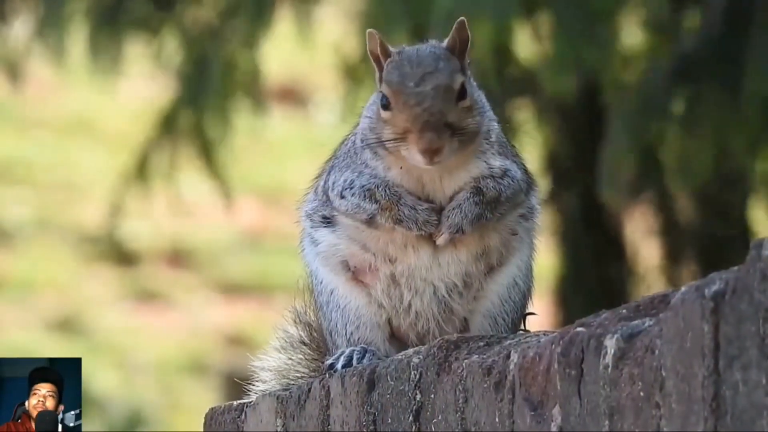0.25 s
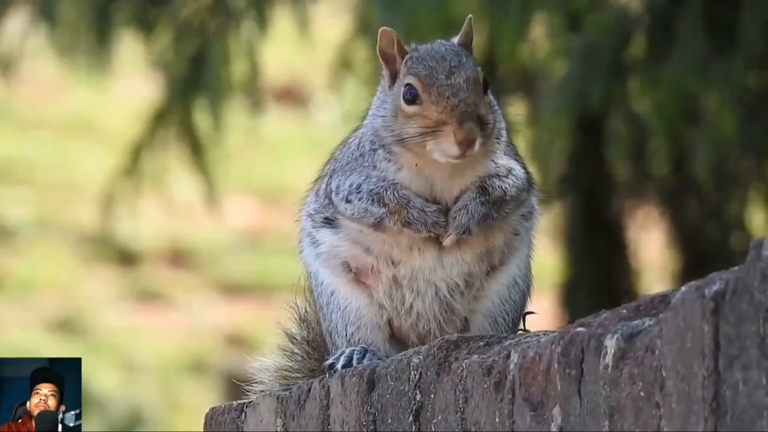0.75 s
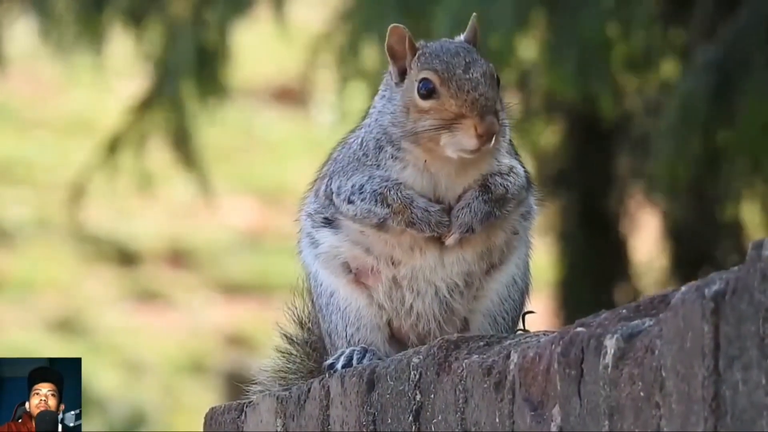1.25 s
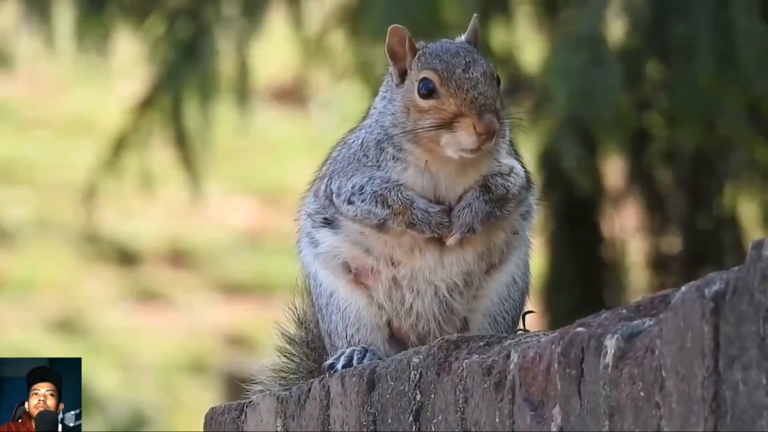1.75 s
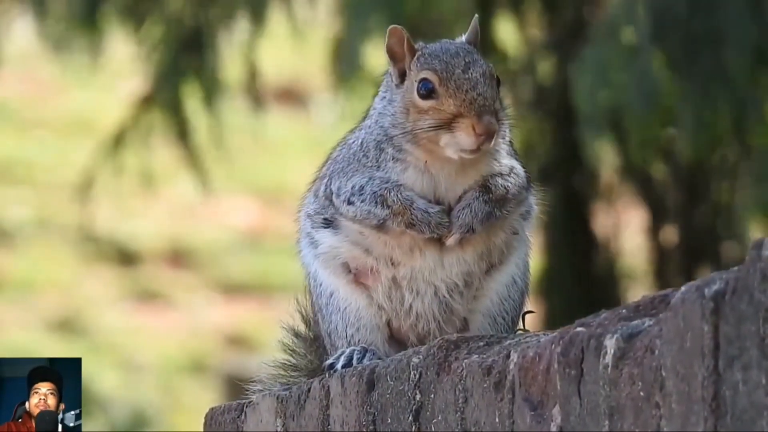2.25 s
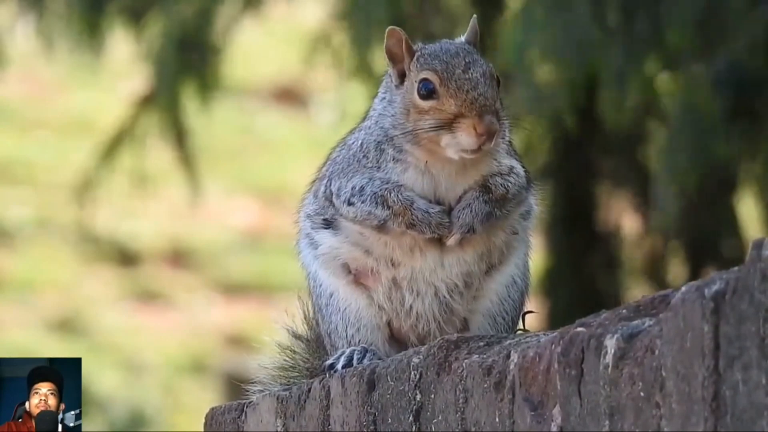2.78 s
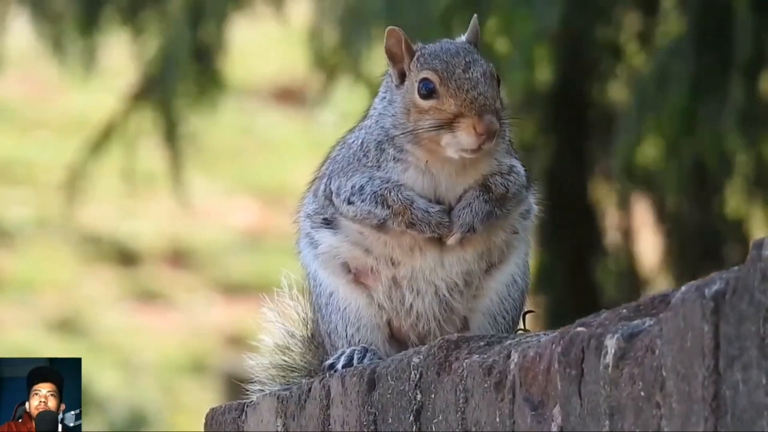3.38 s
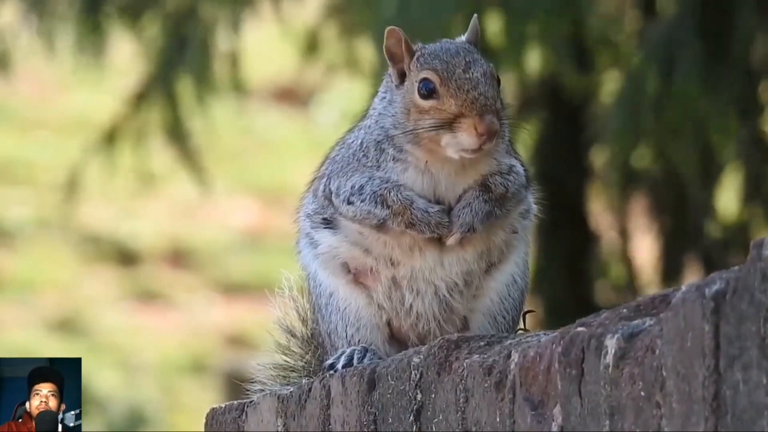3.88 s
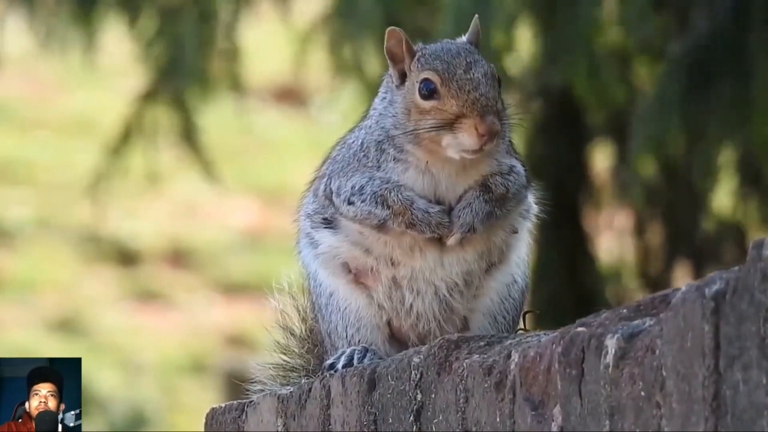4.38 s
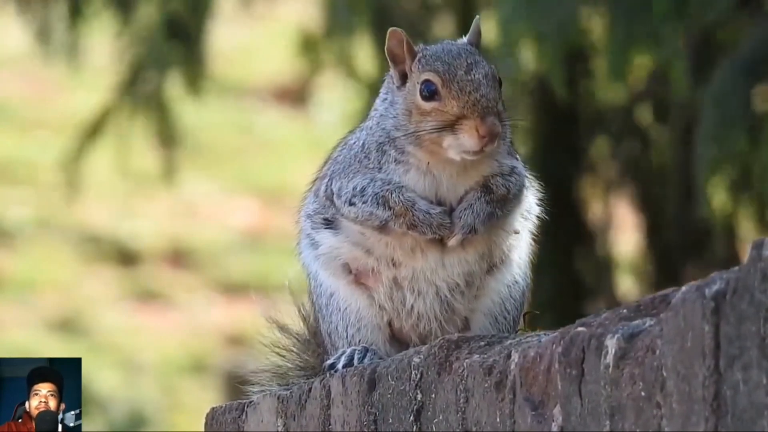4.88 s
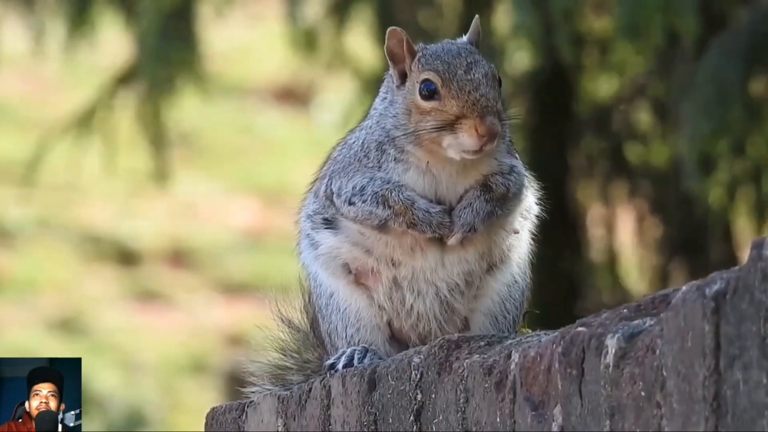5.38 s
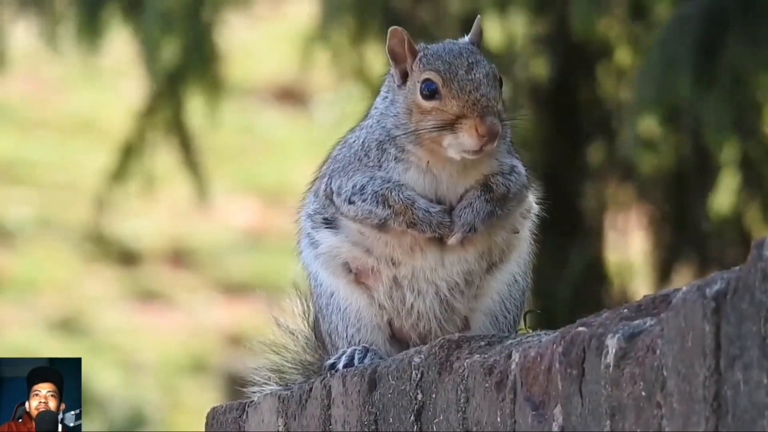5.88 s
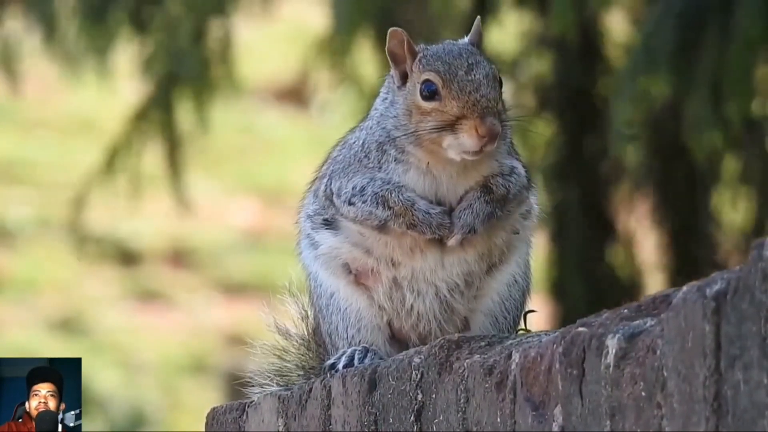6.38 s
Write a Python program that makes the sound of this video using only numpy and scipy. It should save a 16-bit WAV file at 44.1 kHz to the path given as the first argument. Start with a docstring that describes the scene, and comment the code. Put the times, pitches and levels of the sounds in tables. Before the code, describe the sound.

High, hoarse squirrel barks come in three quick pairs, then ten single calls, in a quiet garden with faint leaf hiss.

```python
"""A grey squirrel on a garden fence opens with three quick pairs of barks, a soft bump under the first.
Ten single barks follow. Each is one push of air: a rasp, a pitch arch near 2 kHz, a rasp again.
At the top of the high barks the vocal folds alternate cycles and add half-pitch tones between harmonics.
Fence and trees answer each bark briefly. Two tiny ticks and three far rustles fall along the way.
Throughout: low outdoor rumble, distant machine hum, a faint hiss of leaves."""
import sys
import numpy as np
from scipy import signal
from scipy.fft import rfft, irfft, next_fast_len
from scipy.io import wavfile
from scipy.ndimage import map_coordinates

SR = 44100
rng = np.random.default_rng(int(sys.argv[2]) if len(sys.argv) > 2 else 0)


def unload_wav(signal):
    """Save mono or channel-first audio to the path in sys.argv[1] as 16-bit WAV at rate SR, clipped to [-1, 1]."""
    wavfile.write(
        sys.argv[1],
        SR,
        np.round(np.clip(np.atleast_2d(signal).T, -1, 1) * 32767).astype(np.int16),
    )


N = 292912

# Barks: (apex time [s], apex pitch [Hz], rise [s], fall [s], sweep [fraction of pitch],
# mouth gape [clipped to 0-1], level [dB], 2nd harmonic [dB], 3rd harmonic [dB], split [dB],
# rasp [dB], rasp lead before apex [s], fizz above 7.5 kHz [dB])
BARK_SCORE = [ (0.257, 2051, 0.033, 0.016, .52, 1, -12.5, 0, -1, -37, 0.5, .036, 1.5),
              (.334, 1839, 0.025, 0.017, .19, 0.7, -10, -8, -11.5, -35, -6, 0.02, -2),
              (0.766, 2016, .034, .018, 0.4, 0.96, -16.5, -2, -1.5, -39, 4, .035, 2),
              (.855, 2256, 0.018, 0.018, .33, 3, -21, -6.5, -5, -17.5, -2, 0.014, -2),
              (1.204, 1914, .019, 0.01, 0.1, 0.8, -24, -15.5, -22, -36.5, -17, 0.03, 2.5),
              (1.295, 2270, .031, .016, .28, 0.25, -14.5, -1.5, -7, -5.5, -1, 0.037, -0.5),
              (1.746, 2299, .027, .018, .31, 0.06, -16, 1, 1.5, -1.5, 2, .031, 0.5),
              (2.398, 2268, .025, 0.014, 0.2, 0.11, -14, -0.5, -2, -3, 1, .025, -2),
              (2.94, 2291, 0.022, .015, .33, 0.05, -15.5, 0.5, -2, -5, 2, .026, -1.5),
              (3.361, 2225, .022, .016, .28, 0.03, -17, -0.5, -3, -21.5, 6, 0.027, -1.5),
              (3.781, 2255, .026, 0.014, .27, 0.2, -14.5, -1, -3, -4, 0.5, 0.028, 2.5),
              (4.263, 2350, 0.025, .015, .31, 0.06, -15.5, 1, -1, -1.5, 2.5, 0.029, -1),
              (4.979, 2228, .024, 0.019, .32, 0.01, -17, 1, 1, -4.5, 4, .030, -2.5),
              (5.381, 2376, 0.02, .016, .29, 0.14, -14, -0.5, 0, 0, 1, 0.028, -3.5),
              (5.887, 2377, .032, .018, .33, 0.16, -13, -4, -4.5, -2, 0, .034, -0.5),
              (6.602, 2379, 0.03, 0.015, 0.4, -0.5, -15, 1.5, -3, 3, -1.5, 0.03, -1)]
# Air stream in the throat: (frequency [Hz], level [dB])
RASP_SPECTRUM = [(150, 2), (500, 1.5), (1100, 0.5), (2000, 2), (2700, -4.5), (3600, 1.5), (6000, 0.5),
                 (7300, -6.5), (9500, -2), (11500, -3.5), (15500, -4.5)]
# Throat resonances, mouth nearly shut: (centre [Hz], width [Hz], level [dB])
SHUT_FORMANTS = [(1848, 290, -0.5), (2242, 440, 1.5), (3014, 350, -6.5), (3902, 380, -4.5),
                 (4476, 190, -5.5), (4715, 300, -1.5), (5733, 560, 1), (6366, 1300, -9), (9472, 1800, -16)]
# Throat resonances, mouth gaping: (centre [Hz], width [Hz], level [dB])
GAPE_FORMANTS = [(1109, 3500, -16.5), (1997, 240, -7.5), (3488, 770, -0.5), (4020, 230, -1.5),
                 (4920, 900, -0.5), (5600, 370, 4), (5980, 330, -1.5), (8000, 700, -21.5),
                 (9640, 1100, -18)]
# Stereo width of the direct bark: (frequency [Hz], side gain [dB])
SCATTER_WIDTH = [(500, -7.5), (2000, -17), (3400, -8.5), (4300, -8.5), (6000, -6.5), (9000, -4.5),
                 (14000, -9)]
# Echo decay, fence and trunks: (frequency [Hz], T60 [s])
FENCE_T60 = [(500, .15), (2200, 0.17), (6000, 0.159), (14000, 0.21)]
# Echo decay, garden: (frequency [Hz], T60 [s])
GARDEN_T60 = [(500, .6), (2200, 1), (6000, .5), (14000, .25)]
# Dry ticks: (time [s], level [dB])
TICK_EVENTS = [(1.0056, -44), (5.9994, -43.5)]
# Far rustles: (time [s], half length [s], centre [Hz], level [dB])
RUSTLE_EVENTS = [(2.2, 0.11, 3365, -70.5), (5.299, .025, 7955, -66.5), (5.689, 0.19, 3185, -65)]
# Outdoor noise: (frequency [Hz], level [dB])
AIR_SPECTRUM = [(12, -50.5), (20, -2.5), (70, -4.5), (104, -4), (149, -8), (186, -9), (363, -14.5),
                (454, -15.5), (600, -20), (991, -22.5), (1460, -24.5), (2290, -26.5), (5900, -39.5),
                (8020, -37.5), (15700, -46.5)]
# Left-right likeness of that noise: (frequency [Hz], correlation [0-1])
AIR_COHERENCE = [(60, .98), (150, 1), (500, 0.983), (1600, 1), (5000, 0.46), (15000, 0.56)]
# Leaf hiss: (time [s], level [dB])
LEAF_LEVELS = [(0, -66.5), (1, -68), (2, -68.5), (3, -67.5), (4, -67.5), (4.7, -67), (5.5, -66.5), (6, -68),
               (6.64, -68)]
# Distant machinery: (frequency [Hz], level [dB])
HUM_TONES = [(31, -64), (62.5, -58), (92, -60), (122, -61.5), (990, -70.5)]


def squirrel():
    """Each bark reaches two microphones directly, then off the fence and the garden."""
    out, t = np.zeros((2, N)), np.arange(-SR // 16, SR // 10) / SR
    for apex_s, apex_hz, rise_s, fall_s, sweep, gape, level_db, *timbre in BARK_SCORE:
        call = amp(level_db) * bark(t, apex_hz, rise_s, fall_s, sweep, gape, *timbre)
        add(out, scatter(call), apex_s + t[0])
        fence = amp(-7) * echo_tail(FENCE_T60, delay_s=0.0042)
        garden = amp(-37) * echo_tail(GARDEN_T60, delay_s=0.04)
        add(out, signal.fftconvolve(call[None], fence + garden, axes=1), apex_s + t[0])
    return out


def bark(t, apex_hz, rise_s, fall_s, sweep, gape, second_db, third_db, split_db, rasp_db, lead_s,
         fizz_db):
    """One push of air, apex at t = 0: pitch climbs and drops with the pressure."""
    arch = t / np.where(t < 0, rise_s, fall_s)  # -1 at start, +1 at end
    slack = np.minimum(arch ** 2, 1)  # 0 at peak pressure
    pitch_hz = apex_hz * np.maximum(1 - sweep * arch ** 2, 0.3)
    jitter = 0.001 + 0.026 * slack + np.interp(apex_hz, [1850, 2020], [0.012, 0])  # low barks waver more
    pitch_hz *= 1 + jitter * wobble(1100, len(t))
    phase = 2 * np.pi * np.cumsum(pitch_hz) / SR
    voicing = ease((arch + 0.94) / 0.1) * ease((0.78 - arch) / 0.18)
    split = amp(split_db) * ease((pitch_hz / apex_hz - 0.98) / 0.01)  # near the apex only
    voice = voicing * vocal_folds(phase, split, second_db, third_db)
    side_tone = voicing * split * amp(-19) * np.sin(2 * phase - 2 * np.pi * 3910 * t)
    breath = amp(rasp_db - 15.5) * rasp(t, phase, gape, lead_s, fall_s)
    call = filtered(voice, lambda hz: throat(hz, gape)) + side_tone + breath
    fizz = filtered(call, lambda hz: ease((hz - 7500) / 300))
    return call + fizz * (amp(fizz_db + 3 - 5 * slack) - 1)


def vocal_folds(phase, split, second_db, third_db):
    """Six harmonics; unequal alternate cycles draw power into half-order tones."""
    def partial(order, db):
        flicker_db = 2.2 * wobble(220, len(phase))
        return amp(db + flicker_db) * np.sin(order * phase + rng.uniform(0, 2 * np.pi))

    harmonics = partial(1, -4 * split) + partial(2, second_db) + partial(3, third_db - 7 * split)
    harmonics += sum(partial(k, third_db - 4.5 - 3 * (k - 4)) for k in range(4, 7))
    return harmonics + split * (partial(5 / 2, 0) + partial(7 / 2, -3) + partial(3 / 2, -8))


def rasp(t, phase, gape, lead_s, fall_s):
    """Air hisses through the throat, chopped by the folds, and trails off after the voice."""
    envelope = ease((t + lead_s) / 0.0046) * amp(-600 * np.maximum(t - 0.47 * fall_s, 0))
    chopped = noise(RASP_SPECTRUM, len(t)) * (1 + 0.5 * np.sin(phase))
    hiss = unit(filtered(chopped, lambda hz: throat(hz, gape) ** 0.63))
    return envelope * hiss * amp(2.6 * wobble(400, len(t)))


def throat(hz, gape):
    """Vocal tract gain, blended between shut and gaping."""
    def shape(formants):
        peaks = [amp(db) / (1 + 2 * ((hz - centre_hz) / width_hz) ** 2) ** 2
                 for centre_hz, width_hz, db in formants]
        return np.sqrt(sum(peak ** 2 for peak in peaks) + amp(-28) ** 2)

    gape = np.clip(gape, 0, 1)
    return shape(SHUT_FORMANTS) ** (1 - gape) * shape(GAPE_FORMANTS) ** gape


def scatter(call):
    """Nearby objects shift the phase between the two microphones."""
    def side_gain(hz):
        walk_rad = np.interp(hz, np.linspace(0, SR / 2, 40), np.cumsum(rng.normal(0, 2, 40)))
        return amp(along(SCATTER_WIDTH, hz)) * (0.4 * np.cos(walk_rad) + 1.35j * np.sin(walk_rad))

    side = filtered(call, side_gain)
    return np.array([call + side, call - side]) * amp([[0.4], [-0.4]])


def echo_tail(t60_table, delay_s):
    """Stereo impulse response: decaying noise, energy about 1, faded in around the delay."""
    size = SR // 2
    hz, t, spectra = signal.stft(rng.standard_normal((2, size)), SR, nperseg=256)
    decay = amp(-60 * t / along(t60_table, hz)[:, None])
    tail = signal.istft(spectra * decay, SR, nperseg=256)[1][:, :size]
    tail *= ease(4 * (np.arange(size) / SR / delay_s - 1))
    return tail / np.linalg.norm(tail[0])


def thump():
    """Soft low bump under the first bark."""
    t = np.arange(N) / SR
    spectrum_hz_db = [(60, -28.5), (140, 7.5), (180, -5.5), (300, -15), (1000, -62.5)]
    return amp(-37.5) * np.exp(-((t - 0.258) / 0.02) ** 2) * noise(spectrum_hz_db, N)


def ticks(t60_s=0.018):
    """Tiny dry clicks: fast-decaying bright noise."""
    out, t = np.zeros(N), np.arange(SR // 20) / SR
    spectrum_hz_db = [(1500, -20.5), (3700, -1.5), (6000, -7.5), (8000, -15.5), (15000, -10)]
    for start_s, db in TICK_EVENTS:
        add(out, amp(db + 1 - 60 * t / t60_s) * noise(spectrum_hz_db, len(t)), start_s)
    return out


def rustles():
    """Faint far rustles: noise bands that swell and fade."""
    out, t = np.zeros(N), np.arange(N) / SR
    for peak_s, half_s, hz, db in RUSTLE_EVENTS:
        band = noise([(hz / 2, -20), (hz, 0), (hz * 2, -30)], N)
        out += amp(db) * np.exp(-((t - peak_s) / half_s) ** 2) * band
    return out


def outdoors():
    """Near-mono rumble below 2.2 kHz, wider hiss of stirring leaves above."""
    def mid_side_gain(hz):
        angle_rad = np.arccos(np.clip(along(AIR_COHERENCE, hz), -1, 1)) / 2
        return amp(along(AIR_SPECTRUM, hz)) * [np.cos(angle_rad), np.sin(angle_rad)]

    mid, side = filtered(rng.standard_normal((2, N)), mid_side_gain)
    air = np.array([mid + side, mid - side])
    treble = filtered(air, lambda hz: ease((hz - 2200) / 600))
    rumble = unit(air - treble) * amp(-50 + 0.7 * wobble(9.6, N))
    leaf_db = np.interp(np.arange(N) / SR, *np.transpose(LEAF_LEVELS)) + 3.5 + 0.7 * wobble(5, N)
    return rumble + unit(treble) * amp(leaf_db)


def machine_hum():
    """Distant machinery: tones wavering in level and phase."""
    out, t = np.zeros(N), np.arange(N) / SR
    for hz, db in HUM_TONES:
        rms = amp(db + 2 * wobble(5, N))
        out += rms * np.sqrt(2) * np.sin(2 * np.pi * hz * t + 0.4 * wobble(12, N))
    return out


def amp(db):
    """Decibels to gain."""
    return 10 ** (np.asarray(db) / 20)


def unit(x):
    """Scale to rms 1."""
    return x / np.sqrt(np.mean(x ** 2) + 1e-20)


def along(points, hz):
    """Interpolate (frequency [Hz], value) points on a log axis."""
    knots_hz, values = np.transpose(points)
    return np.interp(np.log(hz + 1), np.log(knots_hz + 1), values)


def wobble(rate_hz, size):
    """Smooth random curve, rate_hz knots a second."""
    position = np.arange(size) * min(rate_hz / SR, 1)
    return map_coordinates(rng.standard_normal(size + 4), [position], mode="mirror")


def ease(u):
    """Smooth 0-to-1 step around u = 0."""
    return 0.5 + 0.5 * np.tanh(u)


def filtered(x, response):
    """Apply a frequency response by padded FFT."""
    size = x.shape[-1]
    padded = next_fast_len(size + 4096)
    return irfft(rfft(x, padded) * response(np.fft.rfftfreq(padded, 1 / SR)), padded)[..., :size]


def noise(spectrum, size):
    """Coloured noise, rms 1."""
    return unit(filtered(rng.standard_normal(size), lambda hz: amp(along(spectrum, hz))))


def add(track, sound, start_s):
    """Mix a sound into the track in place."""
    part = track[..., max(round(start_s * SR), 0):][..., :sound.shape[-1]]
    part += sound[..., :part.shape[-1]]


def scene():
    """The squirrel in its garden."""
    return squirrel() + ticks() + thump() + rustles() + outdoors() + machine_hum()


def record(dry):
    """Brick-wall low-pass at 15.7 kHz."""
    return filtered(dry, lambda hz: hz < 15700)


dry = scene()
out = record(dry)
unload_wav(out)
```